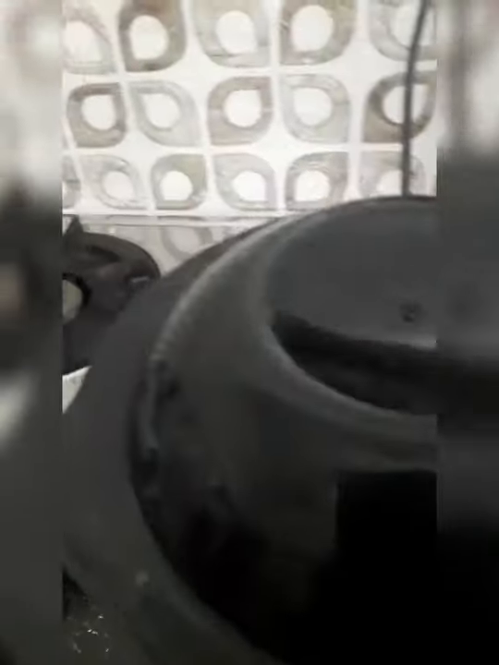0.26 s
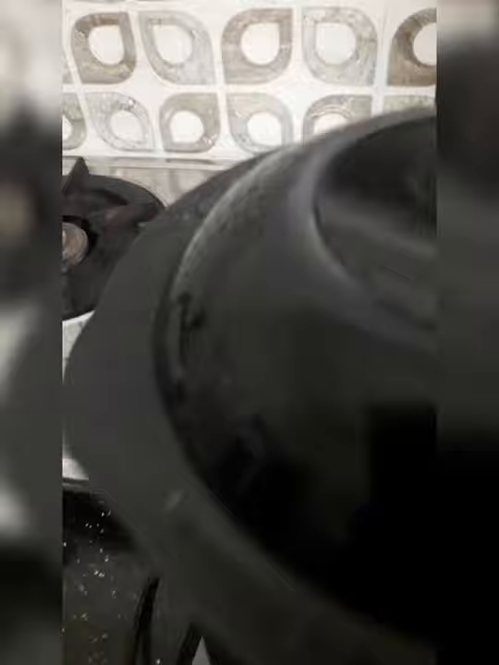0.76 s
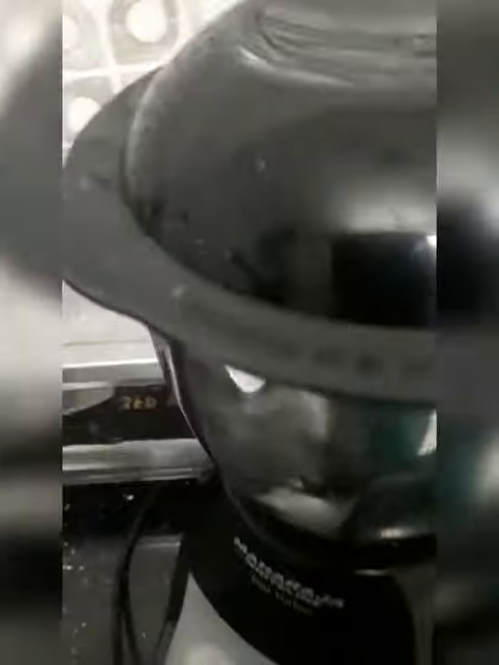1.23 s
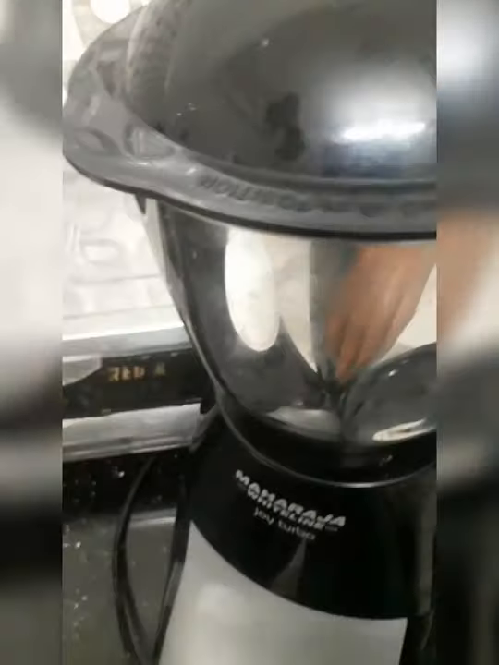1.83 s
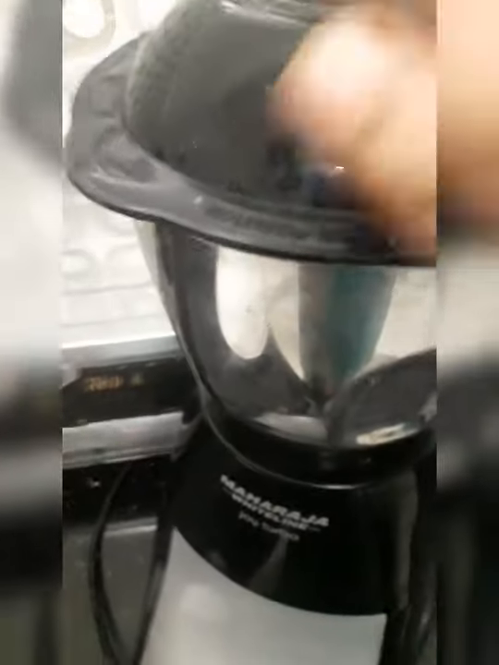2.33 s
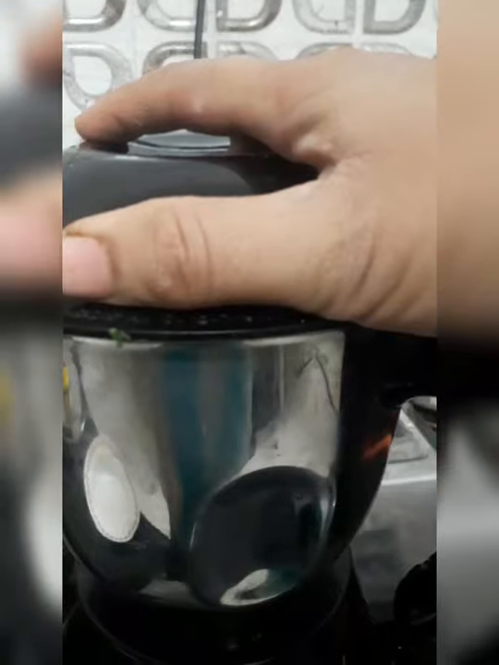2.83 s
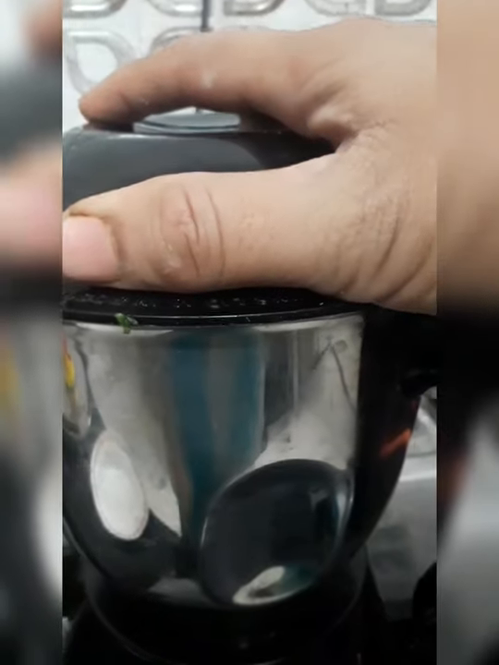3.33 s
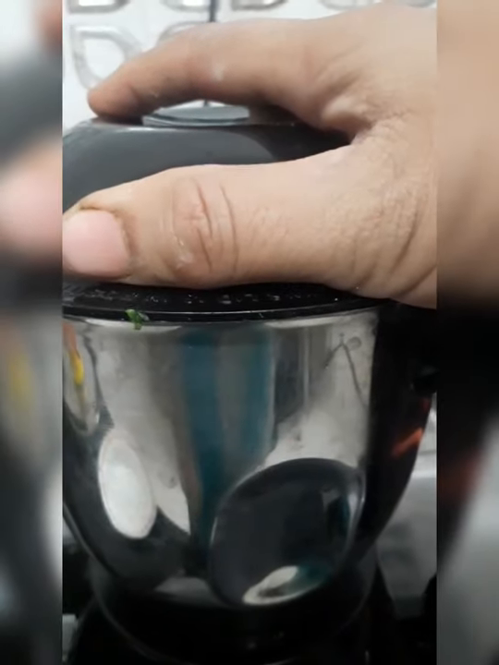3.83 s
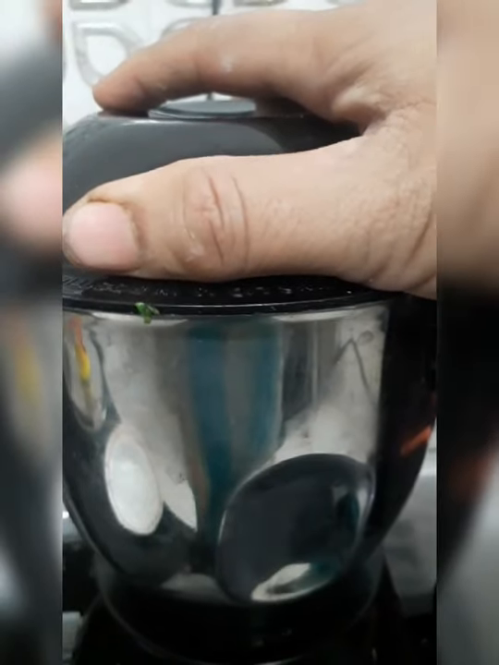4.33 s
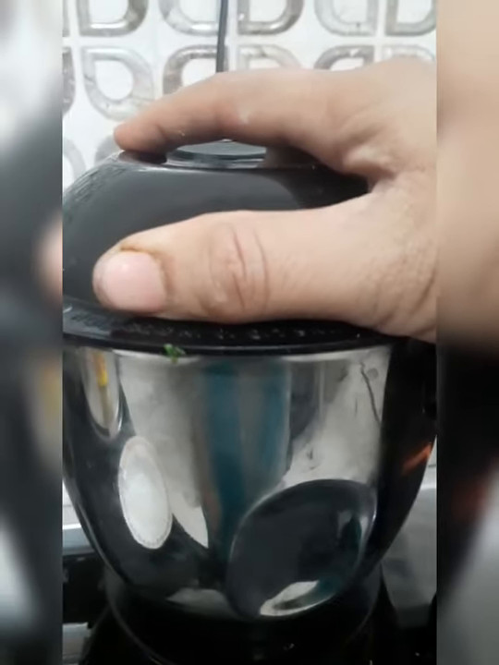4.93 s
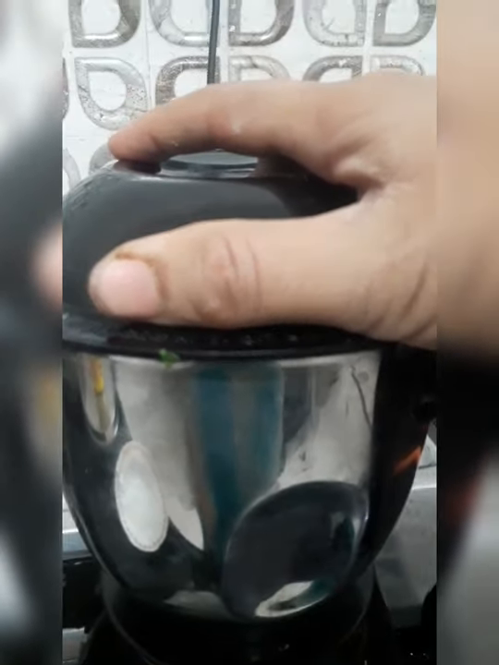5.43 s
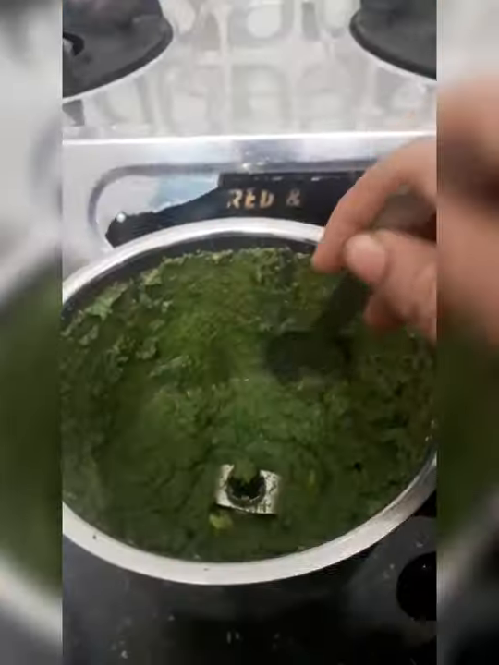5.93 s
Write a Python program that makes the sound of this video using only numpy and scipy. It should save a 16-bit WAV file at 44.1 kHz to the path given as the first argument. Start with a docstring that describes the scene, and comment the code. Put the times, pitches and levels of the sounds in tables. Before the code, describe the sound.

A small close microphone hears a quiet kitchen, then one sharp clattering knock with a short bright echo off the tiles. Later, soft lid thuds and a tiny scrape lead straight into a loud electric grinder: a steady motor hum with buzzing overtones, dense metallic rattle and bright hiss. The motor repeatedly races slightly and sags under load, then cuts off abruptly to near silence with one faint tap.

```python
"""In a small tiled kitchen, a mixer grinder churns thick paste in a steel jar close by.
First comes quiet room air over a swelling rumble, then one sharp clack of decaying noise and ringing modes,
and soft thuds of a hand on the lid. The grinder cuts in at full speed: sine tones follow a shaft that races and
sags with the paste, and dense random impacts ring the jar. It all cuts off at once; one faint touch follows."""
import sys
import numpy as np
from scipy import signal
from scipy.fft import rfft, irfft
from scipy.io import wavfile
from scipy.ndimage import uniform_filter1d

SR = 44100
rng = np.random.default_rng(int(sys.argv[2]) if len(sys.argv) > 2 else 0)


def store_wav(level_fs):
    """Save 16-bit WAV to argv[1]."""
    pcm = np.round(np.clip(np.atleast_2d(level_fs), -1, 1) * 32767)
    wavfile.write(sys.argv[1], SR, pcm.T.astype(np.int16))


N = 272097
T = np.arange(N) / SR  # time in seconds
BIN_HZ = np.arange(N // 2 + 1) * SR / N  # frequencies of the spectrum

ON_S, OFF_S = 2.5342, 5.9745  # the grinder's switch
PULL_HZ = 100  # magnetic pull of the mains

# Slips: the blades fling the paste clear and the shaft races until it slumps back.
# Each row: start in seconds, time running free in seconds, speed gained in Hz.
SLIPS = [(2.486, 0.073, 13.7), (2.647, 0.12, 12.1), (2.949, .12, 10.2), (3.207, .04, 9.1),
         (3.483, 0.063, 15.5), (3.771, 0.12, 12.8), (4.063, 0.024, 8.6), (4.223, .16, 3.5),
         (4.565, 0.02025, 7), (4.703, 0.15, 6.75), (4.942, .11, 5.9), (5.472, 0.0098, 5.86),
         (5.707, .02, 13.3)]


def undb(db):
    """Decibels to gain."""
    return 10 ** (np.asarray(db) / 20)


def unit(x):
    """Scale to rms 1."""
    return x / np.sqrt(np.mean(x ** 2))


def curve(table):
    """Draw straight lines through (seconds, dB) points, one value per sample."""
    seconds, db = np.transpose(table)
    return np.interp(T, seconds, db)


def walk(rate):
    """Smooth chance with spread 1 that changes about rate times a second."""
    spectrum = rfft(rng.standard_normal(N))
    return unit(irfft(spectrum * np.exp(-(BIN_HZ / rate) ** 2), N))


def colour(x, points, modes=()):
    """Filter by a broad (Hz, dB) outline with bell-shaped peaks or dips (Hz, width Hz, dB) on top."""
    hz = BIN_HZ + 1  # keeps the logarithm finite
    point_hz, point_db = np.transpose(points)
    gain_db = np.interp(np.log(hz), np.log(point_hz), point_db)
    for centre, width, peak_db in modes:
        gain_db = gain_db + peak_db / 2 ** ((2 * (hz - centre) / width) ** 2)
    return irfft(rfft(x) * undb(gain_db), N)


def split(x, edge_hz):
    """The parts of a sound below and above an edge."""
    low = irfft(rfft(x) / (1 + (BIN_HZ / edge_hz) ** 8), N)
    return low, x - low


def ring(modes):
    """Response of a struck thing: a sum of fading sines (Hz, dB, t60 s), peak 1."""
    t = T[:SR // 4]
    response = np.zeros(len(t))
    for hz, db, t60 in modes:
        response += undb(db - 60 * t / t60) * np.sin(2 * np.pi * hz * t)
    return response / np.abs(response).max()


def strike(times, dbs, response):
    """Play a response at each time and level."""
    blows = np.zeros(N)
    blows[(np.asarray(times) * SR).astype(int)] = undb(dbs)
    return signal.fftconvolve(blows, response)[:N]


def room(x, wet_db, t60, treble_t60):
    """Add the dense echo of tiled walls; its treble dies sooner."""
    low, high = split(rng.standard_normal(N), 7000)
    tail = low * np.exp(-np.log(1000) * T / t60) + high * np.exp(-np.log(1000) * T / treble_t60)
    tail = tail * (T > .004)  # the first echo needs 4 ms
    echo = signal.fftconvolve(x, tail / np.linalg.norm(tail))[:N]
    return x + undb(wet_db) * echo


def kitchen(mains_db=-66):
    """Steady room air and a faint mains hum over a distant rumble that swells once."""
    # Outline of the quiet kitchen before each band is levelled. Each row: frequency in Hz, relative level in dB.
    kitchen_outline = [(25, -17), (60, -21.5), (100, -5), (170, -7), (205, -10.5), (300, -8), (800, -13.5),
                       (1400, -12.5), (1900, -17.5), (3200, -18.5), (5000, -24.5), (6600, -33.5),
                       (8500, -37), (9400, -49.5), (16000, -49)]
    # Level of the room air. Each row: time in seconds, level in dB.
    air_level = [(0, -49), (0.4, -47.5), (0.9, -47.5), (1.3, -49.5), (1.7, -50.5), (2.1, -52),
                 (2.45, -52.6), (6.17, -54)]
    rumble_db, swell_db, swell_s, swell_width_s = -61.5, 10.5, 1.08, 0.8
    hiss_db, hiss_follow = -58, .7  # hiss at the mean air level, and its share of the air's changes

    noise = colour(rng.standard_normal(N), kitchen_outline, [(140, 60, 5), (226, 57, -8)])
    rumble, rest = split(noise, 200)
    air, hiss = split(rest, 2030)

    air_db = curve(air_level)
    hiss_db = hiss_db + hiss_follow * (air_db - air_db.mean())
    rumble_db = rumble_db + swell_db * np.exp(-((T - swell_s) / swell_width_s) ** 2)

    rumble = unit(rumble) * undb(rumble_db + .5 * walk(6))
    air = unit(air) * undb(air_db + .5 * walk(4.93))
    hiss = unit(hiss) * undb(hiss_db)
    mains = undb(mains_db) * np.sqrt(2) * np.sin(2 * np.pi * PULL_HZ * T)
    return mains + rumble + air + hiss


def clack(level_db=-17.5, knock_db=-32):
    """A hard piece of kitchenware lands with a quick chatter and a hollow knock, and the room answers."""
    # The chatter. Each row: contact time in seconds, level in dB relative to level_db.
    clack_contacts = [(0.4318, -14), (0.4325, 0), (0.4340, -1.5), (0.4362, -11)]
    # The hollow body. Each row: frequency in Hz, relative level in dB, t60 in seconds.
    knock_modes = [(550, 4, 0.11), (580, -11, .06), (717, 1, 0.11)]
    # Colour of the crack. Each row: frequency in Hz, relative level in dB.
    crack_outline = [(200, -30), (600, -6), (1000, -14), (2000, -16), (2900, -5), (4100, 3), (4900, -4),
                     (5650, 4.5), (6600, -11), (9500, -14), (11000, -22), (16000, -24)]

    times, dbs = np.transpose(clack_contacts)
    # every contact is its own short crack
    bursts = strike(times, dbs, np.exp(-T / .0012))
    crack = undb(level_db) * unit(colour(rng.standard_normal(N), crack_outline)) * bursts
    # the hardest contact sets the whole body ringing
    knock = strike([times[dbs.argmax()]], [knock_db], ring(knock_modes))
    return room(crack + knock, wet_db=-5.0, t60=0.4, treble_t60=0.32)


def touches():
    """Soft thuds of the palm on the plastic lid, each with a small scrape of the rim."""
    # Hand on the lid. Each row: time in seconds, thud peak in dB, scrape in dB before its fade shape.
    lid_touches = [(2.432, -49, -59), (2.436, -38, -60.5), (2.447, -48, -40), (2.4855, -26.5, -40),
                   (2.498, -34, -68), (6.105, -42, -66)]
    # Modes of the lid. Each row: frequency in Hz, relative level in dB, t60 in seconds.
    lid_modes = [(170, -9.5, 0.042), (290, 12, 0.027), (450, 4, .03), (640, -12, .02)]

    times, thud_db, scrape_db = np.transpose(lid_touches)
    scrape = unit(colour(rng.standard_normal(N), [(500, -23), (3500, 5), (6000, -6), (12000, -26)]))
    scrape = scrape * (np.exp(-T / 0.0034) - np.exp(-T / .0007))  # quick rise, slower fade
    thuds = strike(times, thud_db, ring(lid_modes))
    scrapes = strike(times, scrape_db, scrape)
    return room(thuds + scrapes, wet_db=-10, t60=.35, treble_t60=0.22)


def freedom():
    """Speed gained over the fully loaded shaft, in Hz: each slip rises, holds and sags at a steady rate."""
    spin_up_s, sag_hz_per_s = .074, 102
    gained_hz = np.zeros(N)
    for start, hold, hz in SLIPS:
        rise = hz * np.clip((T - start) / spin_up_s, 0, 1)
        sag = sag_hz_per_s * np.maximum(T - start - spin_up_s - hold, 0)
        gained_hz = np.maximum(gained_hz, rise - sag)
    return uniform_filter1d(gained_hz, size=882)  # 20 ms rounds the corners


def motor(turns, shaft_hz, hum_db, flutter_db=2.5, wobble=0.14, critical_hz=248, critical_width_hz=4.7, swell_db=4.5):
    """Unbalance hums once a turn; blades and twelve armature slots add overtones, the mains pull side tones."""
    # Motor tones. Each row: multiple of the shaft rate, added multiples of the magnetic pull rate,
    # level in dB before the swell and flutter.
    motor_tones = [(2, 0, -34.5), (3, 0, -37), (4, 0, -37.5), (5, 0, -52), (6, 0, -38), (7, 0, -39),
                   (8, 0, -45), (10, 0, -39), (11, 0, -42.5), (12, 0, -34), (18, 0, -54), (19, 0, -36.5),
                   (20, 0, -37.5), (1, 1, -48), (2, 1, -42), (3, 1, -39.5), (4, 1, -38.5), (5, 1, -38.5),
                   (7, 1, -46), (9, 1, -38)]

    tones = undb(hum_db + .5 * walk(25)) * np.sin(2 * np.pi * turns)
    # the overtones sing loudest when the shaft passes the speed at which the housing resonates
    singing_db = swell_db * (np.exp(-((shaft_hz - critical_hz) / critical_width_hz) ** 2) - .5)
    for multiple, pulls, db in motor_tones:
        # the shifting paste shakes each tone in strength and phase
        cycles = multiple * turns + pulls * PULL_HZ * T + rng.random()
        phase = 2 * np.pi * cycles + wobble * walk(31)
        tones = tones + undb(db + singing_db + flutter_db * walk(11.0)) * np.sin(phase)
    return np.sqrt(2) * tones  # levels are rms


def rattle(turns, steel_db, churn_db, sizzle_db, hits_per_s=8000, scatter_db=1.5, bunching=0.37, air_db=-3, repeat=0.16):
    """Tiny impacts of coupler and paste, bunched three times a turn, ring the jar over rushing cooling air."""
    # Broad colour of jar and housing. Each row: frequency in Hz, relative level in dB.
    jar_outline = [(60, -65), (130, -12), (200, -13.5), (310, -1.5), (600, -5.5), (1000, -4), (2200, -6.5),
                   (3700, -1), (5000, -0.5), (6100, -6), (7300, -7), (9700, -21), (12800, -17.5),
                   (16000, -18)]
    # Jar resonances and the dips between them. Each row: frequency in Hz, width in Hz, boost or cut in dB.
    jar_modes = [(693, 82, -4), (766, 43, -5.5), (1057, 48, 5.5), (1143, 105, -9), (1390, 39, 6),
                 (1610, 38, -0.5), (1686, 40, 5), (1803, 120, 5), (1920, 81, 6), (2140, 130, 1.5),
                 (2440, 56, 4.5), (2480, 50, -0.5), (2700, 200, 2.5), (2870, 50, -1.5), (3185, 87, -4),
                 (3240, 60, 0.5), (4160, 190, 2), (4420, 83, 2), (4570, 41, 3), (4716, 98, 4),
                 (5680, 120, 3), (6690, 310, 3.5), (8600, 600, 1.5), (13100, 910, 3.5), (14145, 700, -5)]

    hits = (rng.random(N) < hits_per_s / SR) * rng.choice([-1, 1], N)
    hits = hits * undb(scatter_db * rng.standard_normal(N))
    drive = unit(hits) * (1 + bunching * np.cos(2 * np.pi * 3 * turns))
    drive = drive + undb(air_db) * rng.standard_normal(N)
    # the same parts meet again one turn later
    turn_ago = np.rint(np.interp(turns - 1, turns, np.arange(N))).astype(int)
    drive = drive + repeat * drive[turn_ago]
    # wall tiles and worktop throw the rattle straight back
    drive = room(drive, wet_db=-11.5, t60=0.26, treble_t60=0.23)

    low, high = split(colour(drive, jar_outline, jar_modes), 1270)
    steel, top = split(high, 9500)
    # lumps of paste make the low churn surge more than the ringing steel
    churn = unit(low) * undb(churn_db + 0.68 * walk(7.6))
    bright = unit(steel) * undb(steel_db) + unit(top) * undb(sizzle_db)
    return churn + undb(0.53 * walk(23)) * bright


def grinder(waver_hz=0.302):
    """The drag of the paste sets speed, hum and rattle; the sound starts and ends within a millisecond."""
    # Top sizzle of the paste. Each row: time in seconds, level in dB before sizzle_gain_db.
    sizzle_level = [(2.56, -33), (2.78, -32), (2.91, -32), (3.02, -34.5), (3.43, -35.5), (3.55, -38.5),
                    (3.65, -33.5), (4.83, -34.5), (5.22, -32.5), (5.51, -35.5), (5.59, -31), (5.78, -36.5),
                    (5.85, -29), (5.95, -36.5)]
    loaded_hz, thicken_hz_per_s = 245.6, 0.4  # shaft rate in full paste, and its fall as the paste thickens
    hum_full_db, hum_db_per_hz, hum_lag_s = -26.5, 0.3364, .03  # the hum grows with speed, a little late
    shed_db_per_hz, shed_s = 0.15, 0.03  # hum dip as a lump leaves the blades, deeper for a big slip
    inertia_s = 0.084  # the rattle answers the load at once, the heavy rotor this much later
    steel_full_db, churn_full_db, sizzle_gain_db = -15.5, -28.5, 2.5  # first two: levels in full paste
    steel_fall_db_per_hz, churn_rise_db_per_hz = 0.048, 0.04  # changes as the blades run free
    steel_follow = 0.19  # share of the sizzle's changes that the ringing jar follows

    gained_hz = freedom()
    shaft_hz = loaded_hz - thicken_hz_per_s * (T - ON_S) + gained_hz + waver_hz * walk(20.5)
    turns = np.cumsum(shaft_hz) / SR

    hum_db = hum_full_db + hum_db_per_hz * np.interp(T - hum_lag_s, T, gained_hz)
    for start, _, hz in SLIPS:
        hum_db = hum_db - shed_db_per_hz * hz * np.exp(-((T - hum_lag_s - start) / shed_s) ** 2)

    free_hz = np.interp(T + inertia_s, T, gained_hz)
    sizzle_db = curve(sizzle_level)
    sizzle_change_db = sizzle_db - sizzle_db[T > ON_S].mean()
    steel_db = steel_full_db - steel_fall_db_per_hz * free_hz + steel_follow * sizzle_change_db
    churn_db = churn_full_db + churn_rise_db_per_hz * free_hz

    running = uniform_filter1d(1. * ((T > ON_S) & (T < OFF_S)), size=16)
    sound = motor(turns, shaft_hz, hum_db) + rattle(turns, steel_db, churn_db, sizzle_db + sizzle_gain_db)
    return running * sound


def scene():
    """Everything reaches one microphone, the same in both channels."""
    return np.tile(kitchen() + clack() + touches() + grinder(), (2, 1))


def record(dry):
    """The small microphone drops the deep bass; the recorder rounds the tallest peaks and cuts the top steeply."""
    top_hz, ceiling = 15750, .72
    thin = signal.sosfilt(signal.butter(3, 65, "high", fs=SR, output="sos"), dry)
    rounded = thin / (1 + (thin / ceiling) ** 8) ** (1 / 8)
    return signal.sosfilt(signal.ellip(10, .1, 80, top_hz, fs=SR, output="sos"), rounded)


dry = scene()
out = record(dry)
store_wav(out)
```